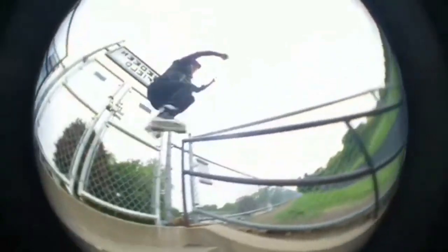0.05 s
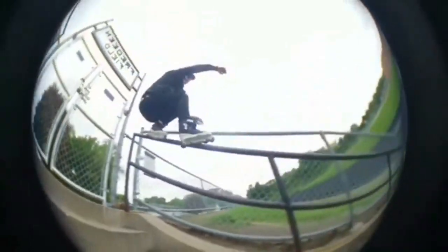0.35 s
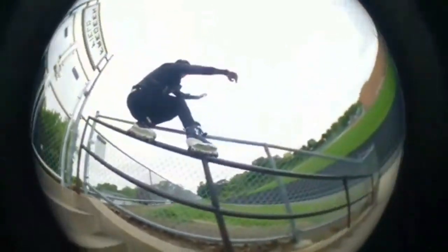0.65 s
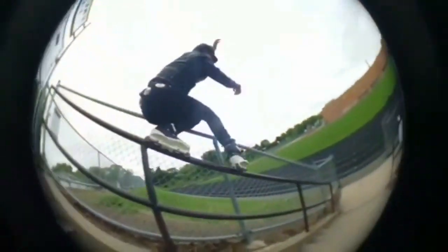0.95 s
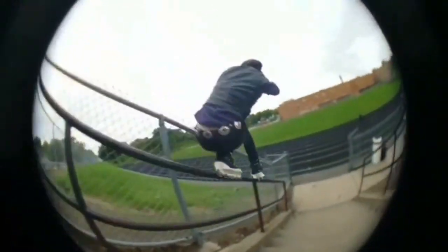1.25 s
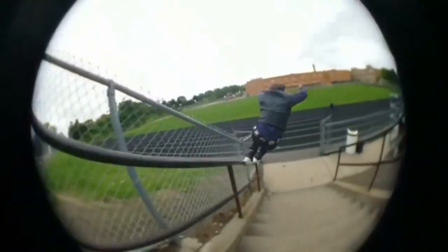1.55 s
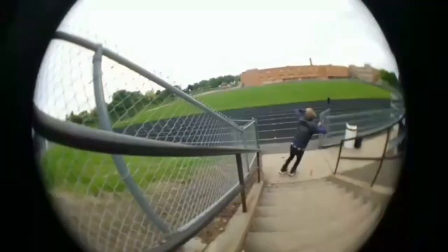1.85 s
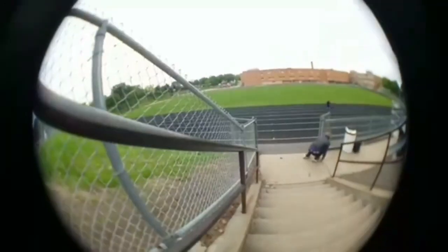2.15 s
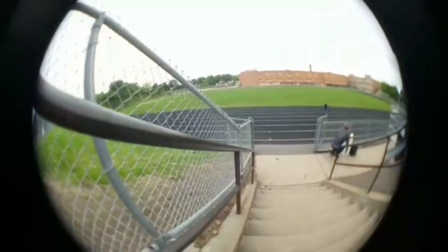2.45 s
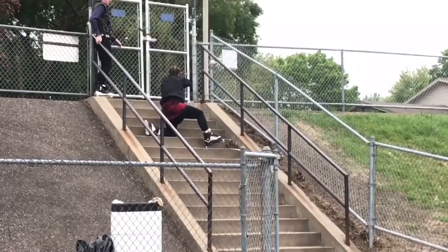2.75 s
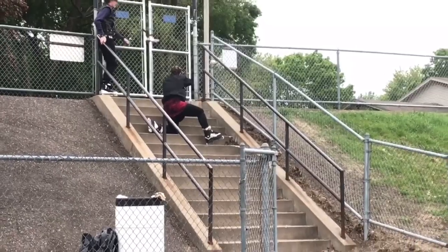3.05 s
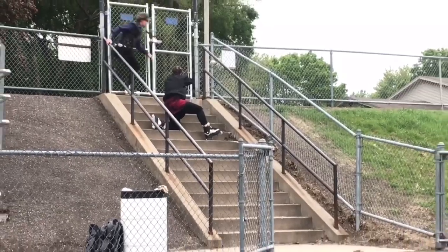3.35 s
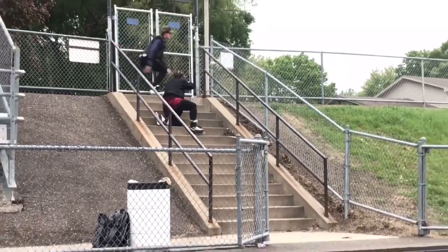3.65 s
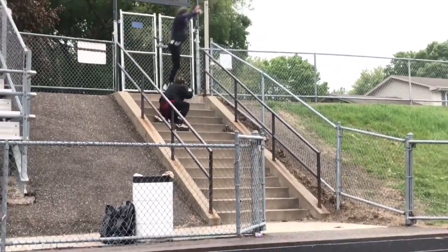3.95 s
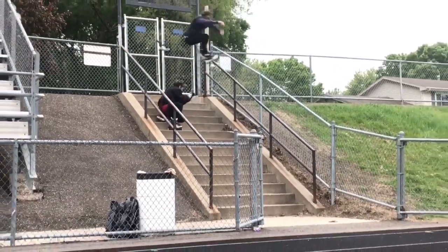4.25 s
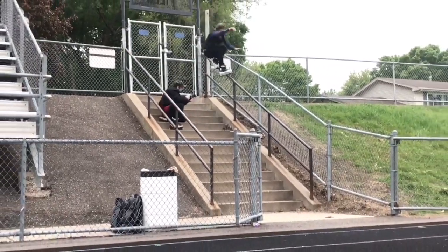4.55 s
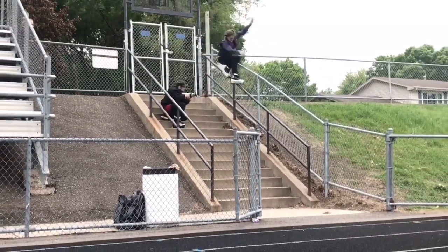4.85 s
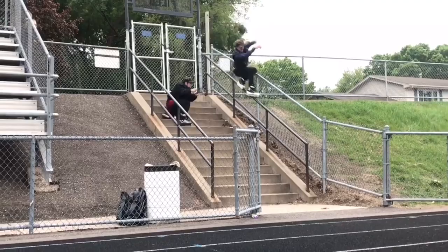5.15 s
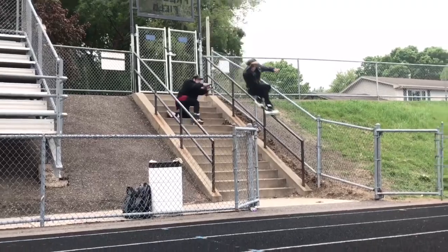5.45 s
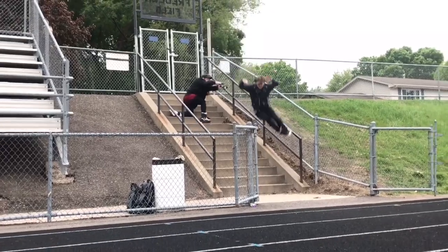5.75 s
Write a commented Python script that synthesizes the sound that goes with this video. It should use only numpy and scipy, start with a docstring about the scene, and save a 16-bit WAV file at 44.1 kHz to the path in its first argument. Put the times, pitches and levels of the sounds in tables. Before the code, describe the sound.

An inline skater hits a metal handrail with a sharp knock near the microphone and slides along it, scraping with small squeaks. A short metallic ring, a heavy landing and fading wheels follow. The trick is then heard from the foot of the outdoor stairs: a distant rumble, a few faint clicks, another knock on the rail and a quieter, swelling grind.

```python
"""An inline skater jumps onto a steel stair rail, heard from close by. The frames knock on the pipe, then
grind down it: stick-slip friction rasps and drives its many long modes, damped by his weight. He lifts
off, the pipe rings freely, and the skates thud onto concrete and roll away. After a cut the trick is
heard from the foot of the stairs, over a distant rumble: a wire gate jangles, the wheels run up, a knock
sets the posts booming, and the long grind follows."""
import sys
import numpy as np
from scipy import signal
from scipy.fft import rfft, irfft, next_fast_len
from scipy.io import wavfile
from scipy.ndimage import map_coordinates

SR = 44100
rng = np.random.default_rng(int(sys.argv[2]) if len(sys.argv) > 2 else 0)


def dump_mix(stems):
    """Bounce the given channels to the path in sys.argv[1] as a 16-bit WAV at rate SR."""
    frames = np.atleast_2d(stems).T  # one column per channel
    limited = np.clip(frames, -1, 1)  # hard clip at full scale
    pcm = np.round(limited * 32767).astype(np.int16)
    wavfile.write(sys.argv[1], SR, pcm)


N = 256132
TIME = np.arange(N) / SR
CUT_S, SECOND_PASS_DELAY_S = 2.672, 4.153
TOUCH_S, LIFT_OFF_S, SLIP_OFF_S, LAST_TOUCH_S = .3, 1.681, 1.72, 1.725

# Spectra of plastic sliding on steel: f/Hz, relative level/dB
NEAR_RASP = [(110, -31), (190, -5.5), (350, 5), (560, 3.5), (950, -5), (1500, -4), (2300, -4), (3100, -4.5),
             (3800, -13.5), (5000, -9.5), (6500, -14), (9500, -19), (12500, -17.5), (14000, -17)]
FAR_RASP = [(110, -7), (330, 4.5), (500, -3), (750, -10.5), (1050, -4.5), (1280, 1.5), (1750, 1),
            (2200, -4), (3500, -6.5), (4300, -14), (4750, -10.5), (5200, -9), (6800, -17), (9300, -22.5),
            (10600, -27), (14000, -25.5)]
# Judder, scrape and hiss bands: lower f/Hz, upper f/Hz
FRICTION_BANDS = [(110, 900), (900, 3500), (3500, 16000)]
def friction(gains, rasp, slips_per_s, grain_db, chatter_db, glide_db):
    """Stick-slip friction: countless tiny slips of the frame under a fluttering load sum to a rasp."""
    sizes = from_db(grain_db * np.minimum(rng.exponential(1, N), 4)) * rng.standard_normal(N)
    slips = sizes * (rng.random(N) < slips_per_s / SR)
    slips = moving_contact(slips, glide_db)
    load = rms_one(from_db(chatter_db * drift(170)))
    return load * sum(gain * colour(slips, rasp, band) for gain, band in zip(gains, FRICTION_BANDS))


# Pressure of the frames on the rail: t/s, relative level/dB
NEAR_PRESSURE = [(0.46, -37.5), (0.5, -40.5), (0.666, -34.5), (0.93, -31.5), (1.026, -34.5), (1.06, -25),
                 (1.27, -24.5), (1.33, -25.5), (1.42, -25), (1.472, -26), (1.492, -30), (1.512, -33.5),
                 (1.53, -25), (1.67, -27), (1.7, -28.5)]
FAR_PRESSURE = [(4.62, -49), (4.648, -52.5), (4.794, -45), (5.092, -41), (5.182, -47), (5.218, -38),
                (5.32, -36), (5.4, -37.5), (5.428, -33.5), (5.49, -35.5), (5.622, -35), (5.66, -43),
                (5.68, -31.5), (5.8, -35.5)]
# Jolts that add judder: t/s, relative lift/dB, Gaussian width/s
JOLTS = [(0.407, 9, 0.051), (1.564, 15, 0.0099)]
def grind_gains(pressure, full_db, band_db, jolt_share, delay_s=0):
    """Friction noise grows with normal force and fades with distance: gains of judder, scrape, hiss."""
    t = np.clip(TIME - delay_s, 0, CUT_S)
    pressure_db = np.interp(TIME, *np.transpose(pressure)) - full_db
    distance_db = -.5 * (t - 1)
    release_db = -60 * np.clip((t - SLIP_OFF_S) / 0.12, 0, 2)
    contact = (t > TOUCH_S) * from_db(distance_db + release_db)
    judder, scrape, hiss = [contact * from_db(db + share * pressure_db)
                            for db, share in zip(band_db, (0.091, 0.89, 0.94))]
    jolt_db = sum(db * gaussian(s, width_s) for s, db, width_s in JOLTS)
    return judder * from_db(jolt_share * jolt_db), scrape, hiss


# Glide of the scrape's resonances in each pass: t/s, shift/semitones
GLIDE = [(.6, 1.8), (.82, -0.78), (1.0, 0.41), (1.28, -0.96), (1.48, 0.75), (1.7, 0.24)]
def moving_contact(x, glide_db, swell_db=2.5):
    """Modal coupling varies as the contact crosses nodes: narrow bands swell, and middle ones glide."""
    hz, s, spectra = signal.stft(x, SR, nperseg=1024, noverlap=768)
    hz, s = np.meshgrid(hz, s, indexing="ij")
    pass_s = np.where(s < CUT_S, s, s - SECOND_PASS_DELAY_S)
    stretch = 2 ** (np.interp(pass_s, *np.transpose(GLIDE)) / 12)
    chance = rng.standard_normal((2, 400, 400))
    swelling = map_coordinates(chance[0], [hz / 168.7, s * 18], mode="wrap")
    gliding = map_coordinates(chance[1], [hz / stretch / 170, s * 8], mode="wrap")
    middle = np.exp(-((hz - 2620) / 1600) ** 2)
    gain = from_db(swell_db * swelling + glide_db * gliding * middle)
    return signal.istft(spectra * rms_one(gain), SR, nperseg=1024, noverlap=768)[1][:N]


# Strong modes of the steel pipe: f/Hz, gain at resonance/dB, T60/s
RAIL_MODES = [(147, 9, 0.34), (216.7, 12, 1.3), (266, 18, 1.8), (319.2, 22, 1.64), (433, 15.5, 1.12),
              (522, 15.5, 1.14), (555, 13.5, 0.57), (651, 12.5, 0.34), (705, 8, 0.69), (833, 10, 0.45),
              (895, 16.5, 1.2), (1196, 6, 0.51), (1286, 8, 0.55), (1363, 7.5, 0.31), (1463, 13, 1.04),
              (1645, 7, 0.42), (1760, 11.5, 1.2), (1886, 10.5, 0.4), (2090, 8.5, 0.41), (2193.5, 11, 0.44),
              (2250, 10, 0.31), (2466, 0, 0.32), (2682, 4, 0.092), (2804, 15, 0.5), (3130, 4, 0.43),
              (3280, 6.5, 0.15), (3686, 4, 0.17), (3770, 10, 0.12), (4710, 10.5, 0.18), (4810, 17, 0.49),
              (4865, 15, 0.47), (5130, 10, 0.27), (5685, 8, .9)]
# Crowded resonances of the pipe wall: f/Hz, width/Hz, lift/dB
WALL_CLUSTERS = [(4790, 320, 11), (5030, 280, 11), (13200, 1100, 4)]
def pipe_response(overtone_db, scatter_db, count):
    """Modal superposition: strong modes plus weak overtones, which decay faster the higher they lie."""
    strong = sum(resonator(hz, from_db(db), t60) * (-1) ** k
                 for k, (hz, db, t60) in enumerate(RAIL_MODES))
    hz = 300 + 14000 * ((np.arange(count) + rng.random(count)) / count) ** 1.3
    lift_db = sum(db * np.exp(-(2 * (hz - centre) / width) ** 2) for centre, width, db in WALL_CLUSTERS)
    gains = from_db(overtone_db + lift_db + scatter_db * rng.standard_normal(count))
    gains *= rng.choice([-1, 1], count)
    return strong + sum(resonator(f, gain, t60=0.62 / (1 + f / 7000)) for f, gain in zip(hz, gains))


def ringing_rail(force, loaded_pipe, free_pipe):
    """Forced, then free vibration: the damping of the skater's weight ends as he lifts off."""
    lifted = np.clip((TIME - LIFT_OFF_S) / 0.033 + 1, 0, 1)
    flick = from_db(5.5) * signal.unit_impulse(N, int(LAST_TOUCH_S * SR))   # the frame snaps off the end
    damped = from_db(-3.5) * through((1 - lifted) * force, loaded_pipe)
    return damped + through(low_cut(from_db(-1) * lifted * force + flick, hz=238), free_pipe)


# Frames biting the pipe wall, wheels scuffing concrete: t/s, level/dB, f/Hz, band/Hz, Gaussian width/s
SQUEALS = [(0.663, -42.5, 5120, 383, 0.015), (0.955, -35, 2880, 380, 0.023),
           (1.068, -31, 4900, 380, 0.0077), (1.185, -38, 4810, 170, 0.032),
           (1.267, -34.5, 4800, 250, 0.015), (1.445, -32, 4740, 200, 0.018),
           (1.692, -37.5, 4950, 380, 0.025), (1.69, -34, 2240, 198, 0.029), (1.72, -38, 2860, 120, 0.019),
           (1.145, -34, 2900, 150, 0.0099), (1.44, -32.5, 3400, 900, 0.036),
           (5.219, -36, 5070, 250, 0.0079), (5.696, -35, 3520, 800, 0.014), (5.713, -30, 4530, 710, 0.0055)]
SCUFFS = [(2.012, -44.5, 2270, 500, 0.011), (2.06, -58, 3900, 1800, .014), (2.135, -60, 3600, 1400, .009),
          (2.275, -64, 3700, 1500, 0.027), (2.49, -70, 3350, 399.5, 0.063)]
def skids(rows):
    """Transient friction: each brief slide is a swell of band-limited noise."""
    return sum(from_db(db) * gaussian(s, width_s) * noise_band(hz, band_hz)
               for s, db, hz, band_hz, width_s in rows)


# Frames striking the rail: t/s, level/dB, treble T60/s, drive to the pipe/dB, treble gain/dB
NEAR_KNOCKS = [(.2945, -18, 0.057, -12, 4), (.3003, -18, 0.047, -8, 3.5), (.3065, -18.5, 0.045, -14, 4),
               (.3125, -19, 0.048, 1, -1), (.3225, -32, 0.1, 15.5, 8.5), (.351, -22, 0.095, 0, -13),
               (.435, -29.5, 0.042, -3, 3.5), (1.521, -23, 0.041, -15, -4), (1.561, -20, 0.068, -8, -13)]
FAR_KNOCKS = [(4.443, -44, 0.23, 13, 3), (4.449, -24.5, 0.11, 2, -4.5), (4.4555, -18, 0.062, -4, -.5),
              (4.467, -30.5, 0.19, 6.5, -3), (5.212, -40.5, 0.077, 12, 8.5), (5.710, -30.5, 0.12, 8, -11)]
# Spectra of the clack of boot and frame: f/Hz, relative level/dB
NEAR_CLACK = [(60, -18), (150, -16), (300, -3.5), (480, 11), (750, 3.5), (1200, 0), (2200, -10.5),
              (3500, -13.5), (5000, -13), (7000, -20.5), (14000, -26)]
FAR_CLACK = [(60, -10), (110, 2), (145, 4), (220, 0), (330, 1.5), (460, 1.5), (640, -7), (850, -7),
             (1300, 2.5), (2200, -8), (4800, -8), (7000, -17.5), (15000, -32)]
def knocks(rows, clack, pipe, bass_hold, drive_band_hz):
    """Compliant impact: boot and frame clack, and the yielding plastic drives mostly the middle modes."""
    noise = colour(rng.standard_normal(N), clack)
    bass = signal.sosfiltfilt(signal.butter(2, 1300, fs=SR, output="sos"), noise)
    direct, force = np.zeros(N), np.zeros(N)
    for s, db, t60, drive_db, treble_db in rows:
        treble = from_db(treble_db) * (noise - bass) * decay(s, t60)
        blow = from_db(db) * (treble + bass * decay(s, t60 * bass_hold))
        direct += blow
        force += from_db(drive_db) * blow
    low_hz, high_hz = drive_band_hz
    return direct + through(high_cut(low_cut(force, low_hz), high_hz), pipe)


# Hard knocks reaching the posts: t/s, level/dB, T60/s
POST_BOOMS = [(.305, -41, 0.79), (1.52, -48, 0.29), (4.468, -26, .2)]
def post_booms(hz, waver, swell_s):
    """Damped oscillation: the posts answer a knock with one low, slightly unsteady mode."""
    pitch_hz = hz * (1 + waver * drift(60))
    tone = np.sqrt(2) * np.sin(2 * np.pi * np.cumsum(pitch_hz) / SR)
    return tone * sum(from_db(db) * np.clip((TIME - s) / swell_s, 0, 1) * decay(s, t60)
                      for s, db, t60 in POST_BOOMS)


# Wheels meeting concrete, one skate after the other: t/s, thud level/dB, crack level/dB
LANDING = [(1.978, -5, -18), (1.9882, -0.5, -26.5), (2.0000, -22, -32), (2.0204, -28, -36)]
# Modes of boot and ground: f/Hz, level/dB, T60/s
THUD_MODES = [(201, -27, 0.067), (228, -10, 0.072), (313, -2, 0.042), (393, -18, 0.13), (540, -18, 0.09),
              (716, -35, 0.2), (1010, -26, 0.017)]
# Spectrum of the frames' crack: f/Hz, relative level/dB
CRACK = [(150, 9.5), (600, 4), (1200, 2), (1800, -15), (2400, -16), (3600, -7.5), (6000, -18.5),
         (8000, -18), (14000, -16)]
def landing(crack_t60, crack_lag_s, contact_hz):
    """Soft contact is a low-pass filter: the wheels thud, then the frames crack as they bottom out."""
    impulses, crack = np.zeros(N), np.zeros(N)
    for s, thud_db, crack_db in LANDING:
        impulses[int(s * SR)] = from_db(thud_db)
        crack += from_db(crack_db) * decay(s + crack_lag_s, crack_t60)
    crack *= colour(rng.standard_normal(N), CRACK)
    boot = -sum(from_db(db) * decay(0, t60) * np.sin(2 * np.pi * hz * TIME) for hz, db, t60 in THUD_MODES)
    thud = low_cut(through(impulses, boot), hz=131)
    thud = signal.sosfilt(signal.butter(2, contact_hz, fs=SR, output="sos"), thud)
    return low_cut(saturate(thud + crack, top=0.43), hz=75)


# Wheels spinning in the air or rolling on concrete: t/s, rumble level/dB, whirr level/dB
SPIN_IN_AIR = [(0, -57, -56.5), (.15, -85, -55.5), (.28, -62, -50)]
SPIN_OFF_RAIL = [(1.78, -51, -57), (1.96, -49, -59.5)]
ROLL_AWAY = [(2.05, -56, -52.5), (2.14, -46, -60), (2.2, -46, -62), (2.28, -48.5, -60), (2.394, -50.5, -66),
             (2.416, -61, -62.5), (2.64, -60, -65)]
RUN_UP = [(3.6, -77, -72), (3.9, -72, -72.5), (4.15, -85, -68), (4.44, -72, -66.5)]
def wheels(rows, flutter_db):
    """Roughness excitation: the turning wheels rumble and their bearings whirr."""
    s, *columns = np.transpose(rows)
    fade = np.maximum(s[0] - TIME, 0) / 0.19 + np.maximum(TIME - s[-1], 0) / 0.35
    rumble, whirr = [from_db(np.interp(TIME, s, db) - 60 * np.minimum(fade, 2)) for db in columns]
    tread = rng.standard_normal(N) * from_db(flutter_db * drift(90))
    return rumble * wheel_band(tread, (90, 1200)) + whirr * wheel_band(tread, (1200, 15000))


# Spectrum of a turning wheel: f/Hz, relative level/dB
WHEEL_SPECTRUM = [(90, 5), (180, 10.5), (300, -1), (800, -14), (1600, -30.5), (3200, -28), (5800, -41),
                  (14000, -38.5)]
def wheel_band(tread, band_hz):
    """Source and filter: one band of the wheel's response to roughness."""
    return colour(tread, WHEEL_SPECTRUM, band_hz)


# Clicks of wheels, buckles and strides: t/s, level/dB, f/Hz, T60/s
TICKS = [(0.046, -44, 11000, 0.026), (0.075, -41, 990, 0.04), (0.127, -38, 690, 0.044),
         (0.163, -38, 3430, 0.0098), (0.189, -37, 2700, 0.011), (2.957, -56.5, 1900, 0.15),
         (3.361, -54, 8000, 0.033), (3.703, -63, 5500, 0.046), (4.172, -48.5, 3000, 0.016),
         (4.201, -58, 7000, 0.06), (4.227, -45.5, 1900, 0.028), (4.279, -45, 3170, 0.014)]
def ticks(relative_width):
    """Brief impacts have broad spectra: each light click is a decaying band of noise."""
    return sum(from_db(db) * decay(s, t60) * noise_band(hz, relative_width * hz)
               for s, db, hz, t60 in TICKS)


def axle_rattle(start_s, end_s, per_s, level_db, spread_db, hz, width_hz, t60):
    """Backlash: loose wheels tick on their axles at uneven intervals."""
    slots = np.arange(start_s, end_s, 1 / per_s)
    noise = noise_band(hz, width_hz)
    chance = rng.uniform(-0.79, 1, (len(slots), 2))
    return noise * sum(from_db(level_db + spread_db * size) * decay(s + late / per_s / 2, t60)
                       for s, (late, size) in zip(slots, chance))


# Resonances of gate wire and latch: f/Hz, width/Hz, level/dB
GATE_MODES = [(2380, 1600, -1), (4760, 350, -3), (6500, 2000, -4), (9600, 1500, -7), (13050, 1000, -2.5)]
# The gate shaken as he pushes off from it and strides past: t/s, level/dB
CLINKS = [(3.313, -61), (3.335, -61.5), (3.361, -63.5), (3.6, -70), (4.2, -67)]
def wire_gate(t60):
    """Impulse excitation: each shake sets the loose wire ringing in a few rough bands."""
    wire = sum(from_db(db) * noise_band(hz, width) for hz, width, db in GATE_MODES)
    return wire * sum(from_db(db) * decay(s, t60) for s, db in CLINKS)


def stairs_echo(x, wet_db, t60, dull_hz):
    """Diffuse reflection: steps and walls scatter a dull tail after a short gap."""
    tail = high_cut(rng.standard_normal(N), dull_hz) * decay(0.0094, t60)
    return x + from_db(wet_db) * through(x, tail / np.sqrt(np.sum(tail ** 2)))


# Spectra of the open air at each place: f/Hz, relative level/dB
NEAR_AIR = [(25, -17), (45, -4), (68, 9.5), (110, -1.5), (250, -7), (600, -4.5), (2000, -66), (14000, -29)]
FAR_AIR = [(15, -46), (25, -31), (53, -5.5), (72, -2), (221, -14.5), (331, -22), (378, -25.5), (703, -31),
           (1240, -32.5), (2230, -40.5), (2630, -45), (3000, -43.5), (4870, -47), (11200, -59.5),
           (15500, -55)]
def open_air(spectrum, level_db):
    """Ambient noise: a stationary rumble, strongest in the bass."""
    return from_db(level_db) * colour(rng.standard_normal(N), spectrum)


# Distant drone and whine: f/Hz, width/Hz, level/dB
DRONE = [(66.1, 8.6, -48), (1224, 54, -67.5)]
def distant_drone():
    """Narrow-band noise is heard as a wavering pitch."""
    return sum(from_db(db) * noise_band(hz, width) for hz, width, db in DRONE)


def from_db(db):
    """Amplitude ratio of a level in dB."""
    return 10 ** (np.asarray(db) / 20)


def rms_one(x):
    """Normalisation to unit rms."""
    return x / np.sqrt(np.mean(x ** 2) + 1e-20)


def colour(x, spectrum, band=(8, 20000)):
    """Spectral shaping within a soft-edged band; rms 1."""
    size = next_fast_len(N)
    hz = np.maximum(np.fft.rfftfreq(size, 1 / SR), 1)
    knots_hz, db = np.transpose(spectrum)
    gain = from_db(np.interp(np.log(hz), np.log(knots_hz), db))
    edges = ((1 + (band[0] / hz) ** 8) * (1 + (hz / band[1]) ** 8)) ** -.5
    return rms_one(irfft(rfft(x, size) * gain * edges, size)[:N])


def noise_band(hz, width_hz):
    """Band-pass noise about a geometric centre; rms 1."""
    low = np.hypot(hz, width_hz / 2) - width_hz / 2
    band = signal.butter(2, [low, min(low + width_hz, SR * .45)], "band", fs=SR, output="sos")
    return rms_one(signal.sosfilt(band, rng.standard_normal(N)))


def drift(per_s):
    """Random modulation, linear between draws; rms 1."""
    return rms_one(np.interp(TIME * per_s, np.arange(N // 20), rng.standard_normal(N // 20)))


def gaussian(centre_s, width_s):
    """Gaussian envelope with peak 1."""
    return np.exp(-.5 * ((TIME - centre_s) / width_s) ** 2)


def decay(start_s, t60):
    """Exponential decay: jumps to 1, then falls 60 dB in t60."""
    envelope = np.zeros(N)
    tail = envelope[int(start_s * SR):int((start_s + 2 * t60) * SR)]
    tail[:] = from_db(-60 * TIME[:len(tail)] / t60)
    return envelope


def resonator(hz, gain, t60):
    """Impulse response of a damped oscillator with the given gain at resonance."""
    radius, angle = np.exp(-np.log(1000) / (t60 * SR)), 2 * np.pi * hz / SR
    drive = 2 * gain * (1 - radius) * np.sin(angle)
    feedback = [1, -2 * radius * np.cos(angle), radius ** 2]
    return signal.lfilter([0, drive], feedback, signal.unit_impulse(SR))


def through(x, response):
    """Convolution with the first second of an impulse response."""
    return signal.fftconvolve(x, response[:SR])[:N]


def low_cut(x, hz):
    """Second-order high-pass: small radiators give little bass."""
    return signal.sosfilt(signal.butter(2, hz, "high", fs=SR, output="sos"), x)


def high_cut(x, hz):
    """First-order low-pass."""
    return signal.lfilter(*signal.butter(1, hz, fs=SR), x)


def saturate(x, top):
    """Soft saturation rounds the highest peaks."""
    return top * np.tanh(x / top)


def scene():
    """Superposition of the sources at two places: close by, then, after a cut, below the stairs."""
    free_pipe = pipe_response(overtone_db=-6.5, scatter_db=3, count=420)
    loaded_pipe = free_pipe * decay(0, t60=.55)[:SR]   # the skater's weight adds damping
    squeals = skids(SQUEALS)
    booms = post_booms(hz=144, waver=0.097, swell_s=0.013)
    clicks = ticks(relative_width=1.03)
    clicks += axle_rattle(0.212, .28, per_s=125, level_db=-42, spread_db=2.5,
                          hz=3070, width_hz=2200, t60=0.013)

    gains = grind_gains(NEAR_PRESSURE, full_db=-24, band_db=(-37.5, -27.5, -32.5), jolt_share=0.86)
    force = friction(gains, NEAR_RASP, slips_per_s=16000, grain_db=1.5, chatter_db=1.14, glide_db=2)
    force += squeals
    near = from_db(-2) * force + ringing_rail(force, loaded_pipe, free_pipe)
    blows = knocks(NEAR_KNOCKS, NEAR_CLACK, loaded_pipe, bass_hold=1.13, drive_band_hz=(270, 2600))
    near += saturate(low_cut(blows, hz=80), top=0.38)
    near += landing(crack_t60=0.051, crack_lag_s=0.00177, contact_hz=1090)
    near = stairs_echo(near + booms + skids(SCUFFS), wet_db=-24.5, t60=0.35, dull_hz=2040)
    near += sum(wheels(rows, flutter_db=1.3) for rows in (SPIN_IN_AIR, SPIN_OFF_RAIL, ROLL_AWAY))
    near += clicks + open_air(NEAR_AIR, level_db=-55.5)
    near = signal.sosfilt(signal.ellip(10, .2, 70, 14100, fs=SR, output="sos"), near)

    gains = grind_gains(FAR_PRESSURE, full_db=-35, band_db=(-44.5, -36.5, -37), jolt_share=0.75,
                        delay_s=SECOND_PASS_DELAY_S)
    force = friction(gains, FAR_RASP, slips_per_s=12000, grain_db=0.5, chatter_db=0.5, glide_db=1)
    force += squeals
    damped_pipe = loaded_pipe * decay(0, t60=0.48)[:SR]
    far = from_db(-2.5) * force + from_db(-3) * through(low_cut(force, hz=463), damped_pipe)
    blows = knocks(FAR_KNOCKS, FAR_CLACK, loaded_pipe, bass_hold=1.26, drive_band_hz=(620, 1580))
    far += saturate(low_cut(blows, hz=59.3), top=0.4)
    far = stairs_echo(far + booms + wire_gate(t60=0.12), wet_db=-16.5, t60=0.63, dull_hz=2480)
    far += wheels(RUN_UP, flutter_db=1.5)
    far += clicks + from_db(-8) * through(clicks, free_pipe)   # the steelwork pings along
    far += open_air(FAR_AIR, level_db=-46.5) + distant_drone()

    dip = np.clip(np.abs(TIME - CUT_S) / 0.027, 0, 1)   # the level dips briefly at the cut
    return (dip * np.where(TIME < CUT_S, near, far))[None]


def record(dry):
    """Band limiting: a steep low-pass removes the treble above 15.8 kHz."""
    return signal.sosfilt(signal.ellip(12, .1, 90, 15800, fs=SR, output="sos"), dry)


dry = scene()
out = record(dry)
dump_mix(out)
```